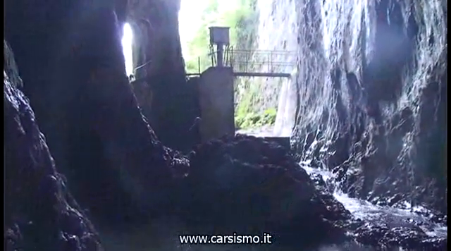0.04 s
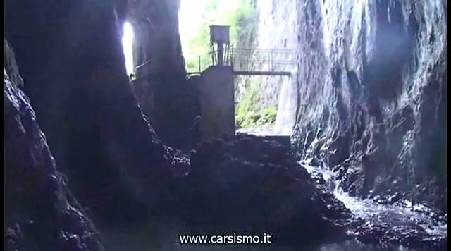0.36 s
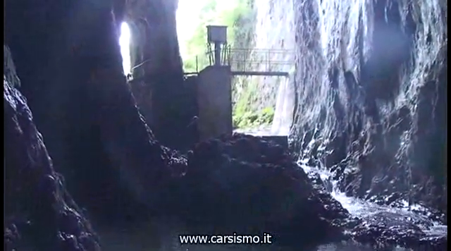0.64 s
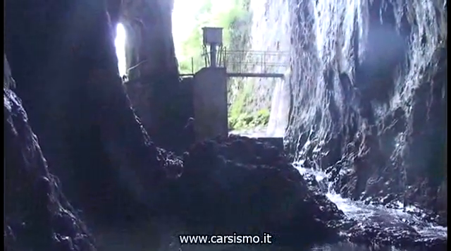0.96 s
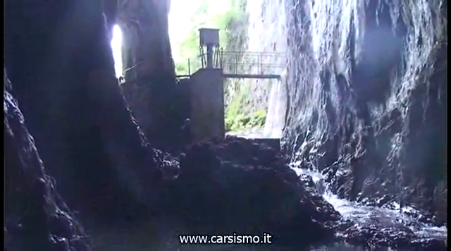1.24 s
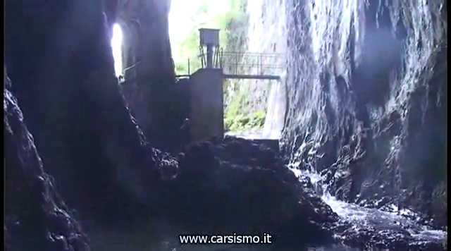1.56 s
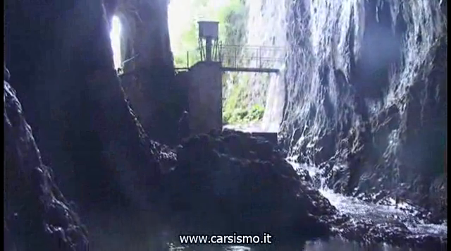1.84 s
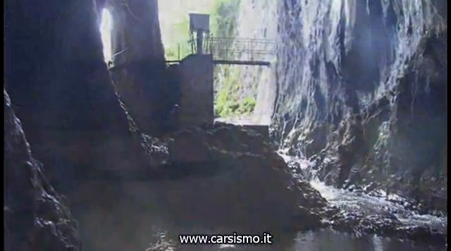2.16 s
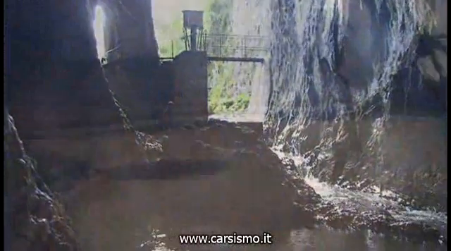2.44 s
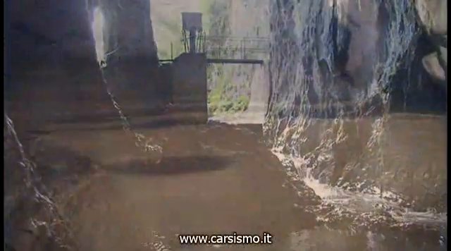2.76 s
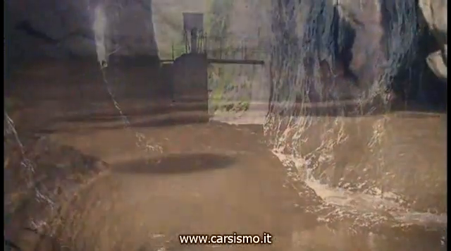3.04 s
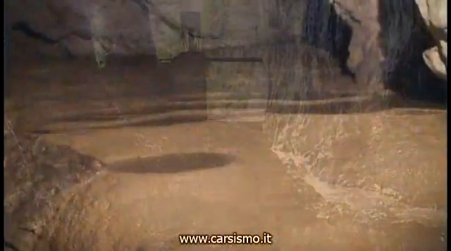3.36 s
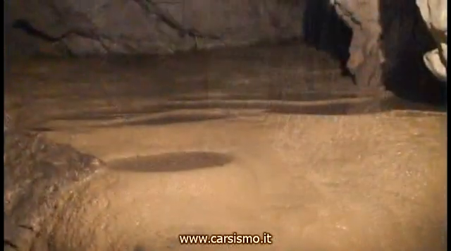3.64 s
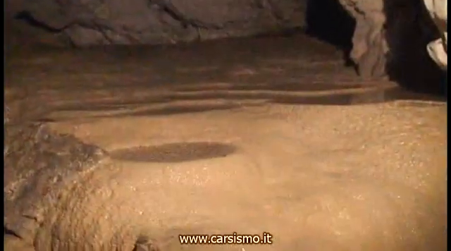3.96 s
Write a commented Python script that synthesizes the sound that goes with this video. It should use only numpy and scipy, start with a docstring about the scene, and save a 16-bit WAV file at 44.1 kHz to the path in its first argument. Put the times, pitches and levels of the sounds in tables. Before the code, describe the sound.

Water rushes through a booming cave passage, with faint bird-like whistles far away.

```python
"""A stream rushes over rocks close by at a cave mouth, and the passage booms with it.
A few faint whistles, like a far bird, echo in; two soft thuds sit under the water.
The sound drops out for an instant, then cross-fades to a brighter, thinner run of water deeper inside.
All is heard through two small, closely spaced microphone ports with strong resonances in the treble."""
import sys
import numpy as np
from scipy import signal
from scipy.fft import rfft, irfft, next_fast_len
from scipy.io import wavfile
from scipy.ndimage import uniform_filter1d, map_coordinates

SR = 44100
rng = np.random.default_rng(int(sys.argv[2]) if len(sys.argv) > 2 else 0)


def unload_wav(signal):
    """Save mono or channel-first audio to the path in sys.argv[1] as 16-bit WAV at rate SR, clipped to [-1, 1]."""
    wavfile.write(
        sys.argv[1],
        SR,
        np.round(np.clip(np.atleast_2d(signal).T, -1, 1) * 32767).astype(np.int16),
    )


N = 176400

# rush of the water at the mouth and deep inside, ahead of the microphone: frequency_hz, density_db
MOUTH_SPECTRUM = [(20, -27), (42, -8), (65, -3.5), (100, -3), (135, -3.5), (200, -4), (290, 0), (380, -2.6),
                  (480, -1.55), (720, -1.9), (1000, -4.5), (1700, -6.5), (2600, -7), (5000, -10.5),
                  (9000, -15)]
DEEP_SPECTRUM = [(20, -24), (45, -11), (110, -12), (170, -1), (270, 0.5), (380, -4.5), (620, -1),
                 (1000, -4.5), (1700, -5), (2400, -4), (3400, -5), (4400, -11), (6000, -9.5), (9000, -10.5)]
# cross-fade between the two positions: time_s, level_db
MOUTH_FADE = [(0, -14.5), (.4, -14), (1.5, -14.5), (1.95, -14), (2.4, -16), (2.9, -20), (3.4, -26),
              (3.8, -40)]
DEEP_FADE = [(1.88, -50), (2.2, -29), (2.6, -20), (2.95, -17), (3.35, -14.5), (3.75, -13), (4, -12.5)]
# standing waves of the passage: pitch_hz, width_hz, gain_db
PASSAGE_MODES = [(69.6, 10, -11.5), (119.8, 8, -5.5), (143.3, 9, 2.5), (166.5, 11, -7), (287.5, 28, -9),
                 (423.7, 25, -8)]
# heavier gulps of water that swell the boom: peak_s, swell_db
GULPS = [(.7, 9), (1.04, 5), (1.41, 6.5), (1.61, 3), (1.8, 7.5), (1.95, 6), (2.12, 3.5)]
# far whistles, ahead of the microphone: start_s, length_s, start_hz, end_hz, waver_ratio, level_db
WHISTLES = [(.23, .13, 1680, 1700, .006, -31.5), (.51, .1, 1890, 1905, .004, -26),
            (.61, .06, 1960, 2070, .014, -26), (.69, .07, 1930, 2030, .016, -27.5),
            (1.95, .13, 1630, 1860, .04, -28), (2.01, .13, 1860, 2020, .045, -27.5)]
# low thuds: start_s, pitch_hz, level_db
THUDS = [(1.08, 52, -22), (1.882, 46, -21.5)]
# echo of the cave: frequency_hz, t60_s
CAVE_DECAY = [(150, 0.98), (2000, 0.97), (8000, 0.25)]
# resonances of the microphone housing: frequency_hz, gain_db
HOUSING_RESPONSE = [(2050, 0), (2400, 3), (2630, 7), (2800, 4), (3000, -4.5), (3200, -13.5), (3370, -15),
                    (3600, -6.5), (3850, 0.5), (4100, -6), (4400, -8.5), (4920, -19.5), (5400, -14),
                    (5950, -8.5), (6500, -11), (7000, -21.5), (7650, -18), (8700, -25.5), (9150, -37)]
# likeness of the left and right ports: frequency_hz, correlation
PORT_CORRELATION = [(40, .972), (180, .982), (350, .957), (650, .9), (1200, .7), (2100, .47), (2650, .15),
                    (3050, -.1), (3300, .1), (3700, -.45), (4700, .3), (5300, -.35), (5950, .05),
                    (6700, -.4), (7450, .36), (8300, .05)]
# uneven sensitivity of the ports: frequency_hz, left_minus_right_db
PORT_BALANCE = [(100, -1.9), (800, -2.5), (2100, -2.5), (2520, -5.5), (2800, 1.5), (3100, -0.5),
                (3500, -2.5), (6700, -1), (7650, -3), (8400, 0)]

TOP_HZ = 9250  # band limit
TIME_S = np.arange(N) / SR
DIRECT = np.array([[1], [0]])  # direct sound feeds only the mid of a mid/side pair


def mouth_stream():
    """At the cave mouth: rapids over rocks, with the boom of the passage behind."""
    water = rapids(MOUTH_SPECTRUM, patchy_db=0.62, surge_db=0.14, churn_db=-0.35)
    return amp(curve(MOUTH_FADE)) * unit(microphone(water + amp(-13.5) * passage_boom()))


def deep_stream():
    """Further in: brighter water, with the microphone's resonances a little lower."""
    water = rapids(DEEP_SPECTRUM, patchy_db=0.33, surge_db=-0.2, churn_db=0.13)
    return amp(curve(DEEP_FADE)) * unit(microphone(water, shift=0.98))


def rapids(spectrum, patchy_db, surge_db, churn_db):
    """White water with bubbles in it; it surges slowly and churns fast."""
    rush = filtered(patchy_noise(patchy_db), lambda hz: amp(along(spectrum, hz)) * (hz < TOP_HZ))
    water = unit(rush) + amp(-13) * bubbles()
    return water * amp(surge_db * wobble(4.9) + churn_db * wobble(21.83))


def patchy_noise(patchy_db):
    """The water's hiss: two unrelated noises with shared loud and soft patches in frequency and time."""
    spectra = signal.stft(rng.standard_normal((2, N)), nperseg=512)[2]
    patches = uniform_filter1d(rng.standard_normal(spectra.shape[1:]), size=6, axis=0)
    patches = uniform_filter1d(patches, size=12, axis=1)
    return unit(signal.istft(spectra * amp(patchy_db * unit(patches)), nperseg=512)[1][:, :N])


def bubbles(per_s=700, median_hz=798.5, log_spread=0.702, ring_cycles=11, rise=.15):
    """Crowds of bubbles, each ringing briefly as its pitch rises, blurred by the cave."""
    draws = rng.random((int(per_s * N / SR), 4)).clip(1e-4, 1 - 1e-4)
    start, radius, angle, size = draws.T[:, :, None]
    gaussian = np.sqrt(-2 * np.log(radius)) * np.cos(2 * np.pi * angle)
    hz = np.clip(median_hz * np.exp(log_spread * gaussian), 120, 7000)
    t = np.arange(SR // 20) / SR
    age = t * hz / ring_cycles  # 1 when the ring is 40 dB down
    strength = amp(-3 * np.log(size))  # a few stand out
    envelope = strength * np.exp(-np.log(100) * age) * (1 - np.exp(-t * hz))
    rings = envelope * np.sin(2 * np.pi * hz * t * (1 + rise * age / 2))
    samples = (start * N).astype(int) + np.arange(len(t))
    crowd = np.bincount(samples.ravel(), rings.ravel())[:N]
    return unit(crowd * DIRECT + amp(-7) * cave_echo(crowd))


def passage_boom(gulp_width_s=.055):
    """The churning water keeps the passage's standing waves ringing; each gulp swells them."""
    def modes(hz):
        return sum((-1) ** k * amp(db) * 1j * hz * width / (pitch ** 2 - hz ** 2 + 1j * hz * width)
                   for k, (pitch, width, db) in enumerate(PASSAGE_MODES))
    swell_db = sum(db * np.exp(-((TIME_S - peak_s) / gulp_width_s) ** 2) for peak_s, db in GULPS)
    return amp(swell_db) * unit(filtered(rng.standard_normal((2, N)), modes))


def far_whistles(edge_s=.02):
    """Thin gliding notes from a distance, with about as much echo as direct sound."""
    out = np.zeros((2, N))
    for start_s, length_s, start_hz, end_hz, waver, level_db in WHISTLES:
        t = TIME_S - start_s
        hz = np.interp(t, [0, length_s], [start_hz, end_hz]) * (1 + waver * wobble(130))
        envelope = np.clip(np.minimum(t, length_s - t) / edge_s, 0, 1)
        note = envelope * np.sin(2 * np.pi * np.cumsum(hz) / SR)
        echo = unit(cave_echo(note)) * note.std()
        out += np.sqrt(2) * amp(level_db) * (note * DIRECT + amp(-1) * echo)
    return microphone(out)


def thuds(attack_s=.003, t60_s=.13):
    """Soft low bumps under the water: damped tones, alike in both channels."""
    out = np.zeros(N)
    for start_s, pitch_hz, level_db in THUDS:
        t = np.maximum(TIME_S - start_s, 0)
        envelope = np.exp(-np.log(1000) * t / t60_s) * (1 - np.exp(-t / attack_s))
        out += amp(level_db) * envelope * np.sin(2 * np.pi * pitch_hz * t)
    return out


def cave_echo(x):
    """Two unrelated echoes off the rock; the treble dies first."""
    hz, t, spectra = signal.stft(rng.standard_normal((2, SR)), SR, nperseg=256)
    decay = amp(-60 * t / along(CAVE_DECAY, hz)[:, None])
    tail = signal.istft(spectra * decay, SR, nperseg=256)[1]
    return signal.fftconvolve(x[None], tail / np.linalg.norm(tail[0]), axes=1)[:, :N]


def microphone(pair, shift=1):
    """Diffuse sound at two close ports: the housing rings, the bass is shared, the sensitivity uneven."""
    def housing(hz):
        angle = np.arccos(np.clip(along(PORT_CORRELATION, hz / shift), -1, 1)) / 2
        return amp(along(HOUSING_RESPONSE, hz / shift)) * [np.cos(angle), np.sin(angle)]

    def balance(hz):
        return amp(along(PORT_BALANCE, hz / shift) * np.array([[.5], [-.5]]))
    mid, side = filtered(pair, housing)
    return filtered(np.array([mid + side, mid - side]), balance)


def amp(db):
    """Decibels to gain."""
    return 10 ** (np.asarray(db) / 20)


def unit(x):
    """Scaled to rms 1."""
    return x / np.sqrt(np.mean(x ** 2) + 1e-20)


def along(points, hz):
    """Rows of frequency_hz, value, read at hz on a log axis."""
    knots_hz, values = np.transpose(points)
    return np.interp(np.log(hz + 1), np.log(knots_hz + 1), values)


def curve(rows):
    """Rows of time_s, value, read at every sample."""
    return np.interp(TIME_S, *np.transpose(rows))


def wobble(knots_per_s):
    """A smooth random curve."""
    return map_coordinates(rng.standard_normal(N // 100), [TIME_S * knots_per_s], mode="wrap")


def filtered(x, response):
    """x through a filter whose gain is response(hz)."""
    size = next_fast_len(N + SR // 2)
    return irfft(rfft(x, size) * response(np.fft.rfftfreq(size, 1 / SR)), size)[..., :N]


def scene():
    """Both stretches of water, the whistles and the thuds."""
    return mouth_stream() + deep_stream() + far_whistles() + thuds()


def record(dry):
    """The level drops out for an instant, the highest peaks round off and the top treble is cut."""
    dropout_s, ceiling = [1.862, 1.8815], .92
    dropout_db = np.interp(TIME_S, dropout_s, [-11, -18], left=0, right=0)
    dipped = dry * uniform_filter1d(amp(dropout_db), size=24)
    rounded = dipped / (1 + np.abs(dipped / ceiling) ** 16) ** (1 / 16)
    return filtered(rounded, lambda hz: hz < TOP_HZ)


dry = scene()
out = record(dry)
unload_wav(out)
```